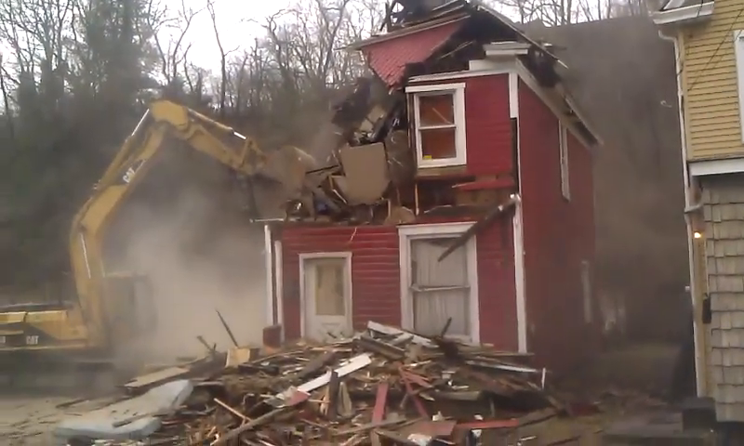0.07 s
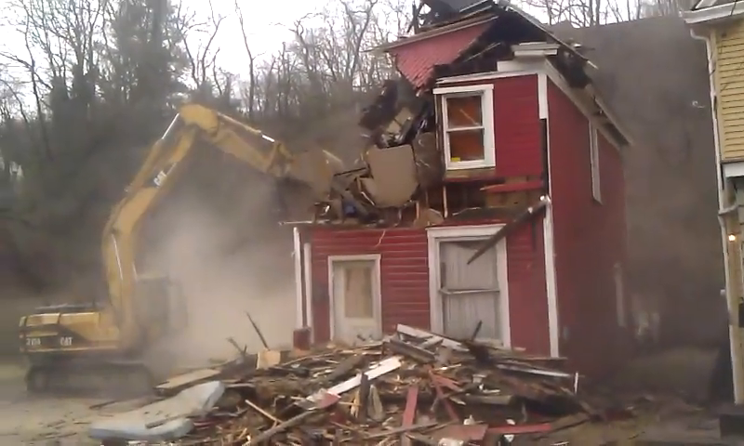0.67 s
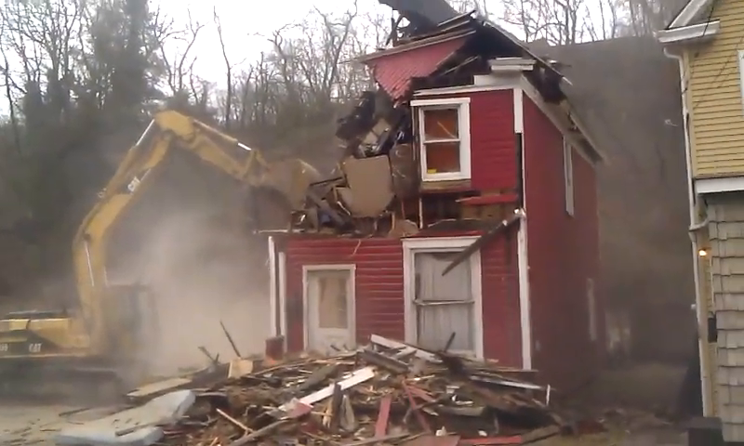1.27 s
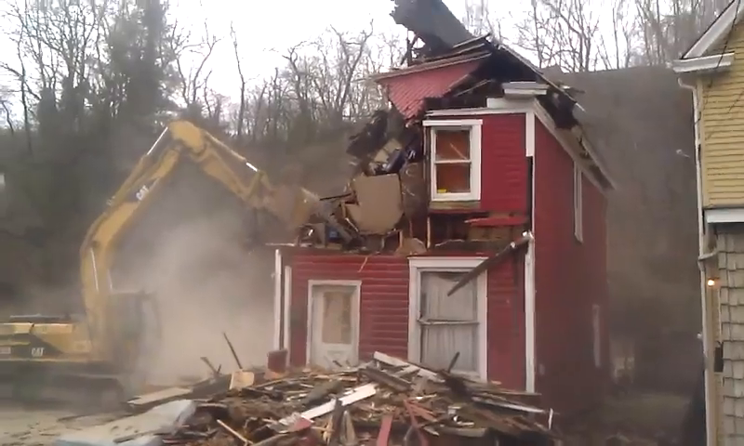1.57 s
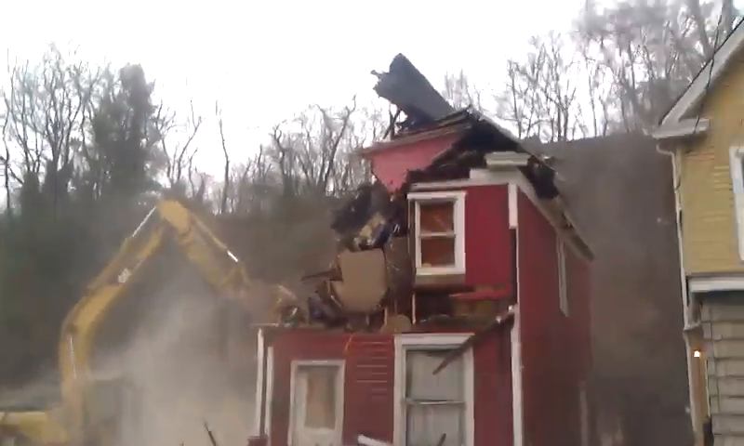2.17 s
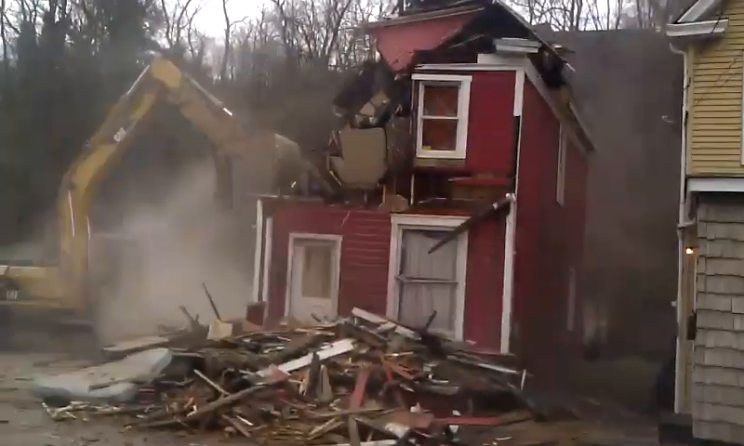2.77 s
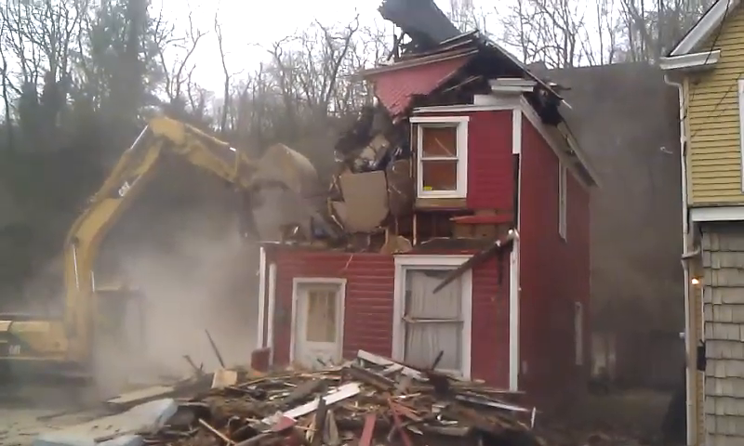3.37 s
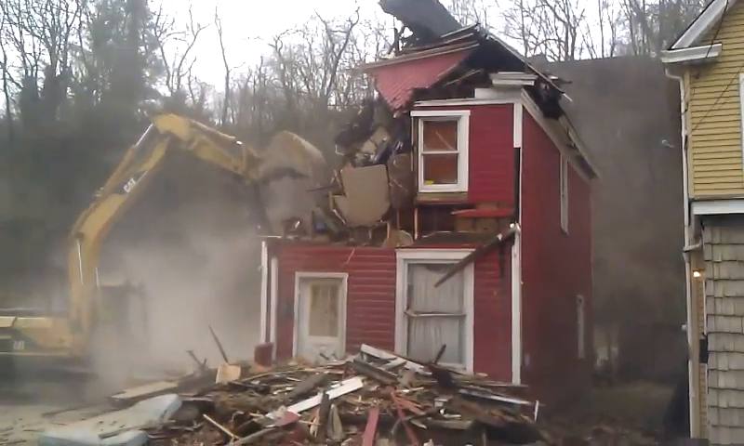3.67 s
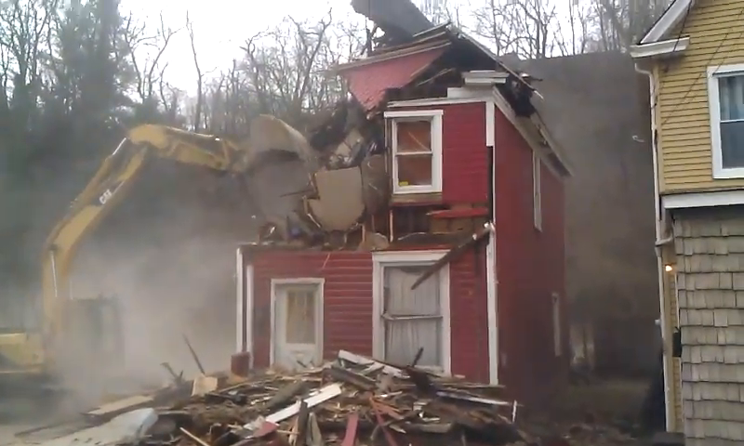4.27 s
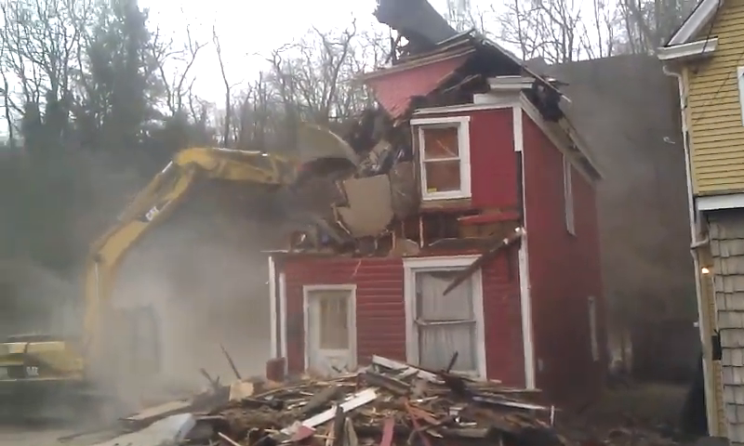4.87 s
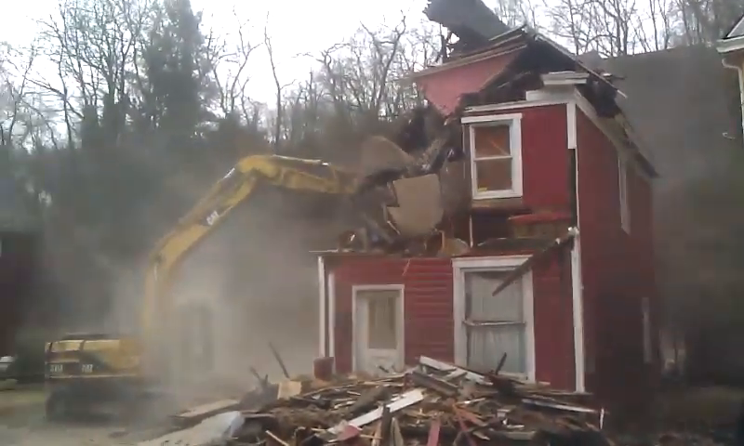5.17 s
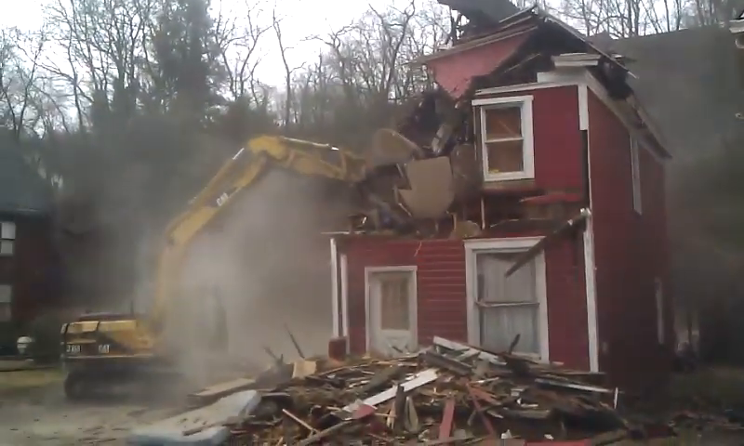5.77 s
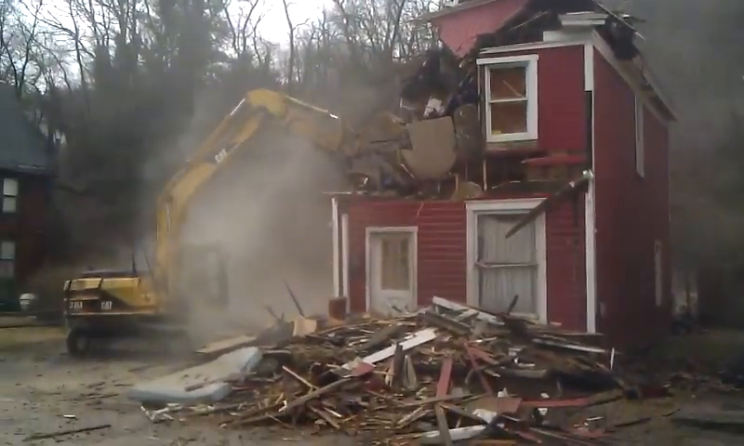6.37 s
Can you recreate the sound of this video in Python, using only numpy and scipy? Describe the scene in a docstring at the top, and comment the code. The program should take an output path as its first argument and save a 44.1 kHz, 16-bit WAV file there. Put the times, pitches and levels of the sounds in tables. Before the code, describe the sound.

Wind buffets the microphone, then eases as an excavator roars and whines, tearing into a wooden house with cracking boards and sliding debris.

```python
"""Wind buffets the microphone, so hard that a limiter (an automatic volume control) ducks all else.
Some way off outdoors, an excavator tears at a wooden house: its diesel roars under the whine of
the hydraulic pump. The bucket scrapes through the wall, boards crack and splinter, nails squeak,
and debris slides down with a few bright clinks. As the wind eases, lone eddies (small swirls of
air) still thump the microphone."""
import sys
import numpy as np
from scipy import signal
from scipy.fft import rfft, irfft, next_fast_len
from scipy.io import wavfile
from scipy.ndimage import uniform_filter1d, minimum_filter1d, map_coordinates

SR = 44100
rng = np.random.default_rng(int(sys.argv[2]) if len(sys.argv) > 2 else 0)


def transcribe(u):
    """Save the signal u as a 16-bit wav file named by the first command-line argument.

    u: samples, shape (n,) or (channels, n), limited to [-1, 1]; the rate is SR.
    q: integer samples, one column per channel.
    """
    v = np.clip(np.atleast_2d(u).T, -1, 1)
    q = np.round(v * 32767).astype(np.int16)
    wavfile.write(sys.argv[1], SR, q)


N = 282681
T = np.arange(N) / SR

# Levels in all tables are relative. A t60 is the time a sound takes to fade by 60 dB.
# tone colour of splintering wood: f/Hz, level/dB
SPLINTER_SPECTRUM = [(60, -68), (1000, -23), (2100, 5), (3000, 5.5), (4300, 6.5), (5700, -7.5),
                     (8200, -8.5)]


def excavator():
    """One shaft drives pump and gears; the diesel fires once for every three pump piston strokes."""
    # how fast the pump's pistons beat: t/s, f/Hz
    piston_rate = [(0.0, 307.7), (1.18, 305.7), (1.68, 311.3), (1.9, 307.4), (2.4, 318.2), (2.54, 317),
                   (2.74, 308.3), (3.1, 313.6), (3.22, 311), (3.52, 314.3), (3.98, 309.7), (4.26, 310.6),
                   (4.86, 313.5), (5.34, 318.5), (5.52, 314.4), (5.74, 317.3), (6.42, 307.4)]
    # the pump's lowest tone, its octave and its double octave, each: t/s, level/dB
    hum_levels = [(0, -33.5), (1.5, -38.5), (1.95, -34), (2.35, -35), (3.15, -34.5), (3.27, -45),
                  (3.4, -34), (3.7, -44), (4.05, -36), (4.4, -43), (4.65, -43.5), (4.85, -34.5),
                  (5.15, -32), (5.5, -44), (5.7, -33.5), (6.1, -40.5), (6.3, -33)]
    drone_levels = [(0, -54), (1.6, -39), (1.9, -37), (3.45, -35), (3.75, -39.5), (4.55, -36), (4.73, -52),
                    (4.95, -35.5), (5.5, -50.5), (6.41, -39)]
    sing_levels = [(0, -47), (1.5, -38.5), (1.82, -34), (2.5, -35.5), (3, -42.5), (3.7, -53), (4.3, -38),
                   (4.9, -45), (6.41, -43)]
    # loudness of the machine and of its whine, ducked while the wind buffets, each: t/s, level/dB
    machine_levels = [(0, -8), (1.4, -4), (2.3, 3), (3, 1), (4.2, 0), (5.1, 0.5), (6.41, 4.5)]
    whine_levels = [(0, -8), (1.4, -12), (1.85, 5.5), (2.35, -3), (2.7, 2.5), (3.05, -3), (3.25, 0),
                    (4.45, 3), (4.7, -1), (5, 1.5), (5.5, -5), (6.3, -0.5)]
    # the pump's weaker overtones: multiple of the piston rate, level/dB, flutter/rad
    overtones = [(3, -49.5, 0.33), (5, -47, 0.26), (7, -42.5, 0.38), (8, -49.5, 0.27), (9, -48.5, 0.45),
                 (10, -50.5, 0.12), (11, -49.5, 0.32), (12, -55, 0.4), (13, -50, 0.45), (14, -51, .4)]
    # two high tones that swell while the bucket curls: multiple of the piston rate
    squeal_multiples = [9.15, 10]
    # gear and fan tones at the average speed: f/Hz, level/dB
    gear_tones = [(216, -46), (255, -50), (535, -53), (917, -46.5), (1460, -48.5), (2890, -55),
                  (3990, -59.5)]
    # tone colour of the diesel's roar: f/Hz, level/dB
    roar_spectrum = [(20, -42.5), (45, -26), (100, -11), (150, -7), (230, -2.5), (450, -4.5), (800, -1),
                     (1100, -4), (1600, -5), (2500, -9.5), (3500, -8), (4500, -14.5), (5700, -22),
                     (8000, -27.5)]

    rate = over_time(piston_rate)
    phase = 2 * np.pi * np.cumsum(rate + 0.251 * wobble(10)) / SR
    hum = amp(over_time(hum_levels)) * wavering(phase, fade_db=1.8, drift=0.055, flutter=0.23)
    drone = amp(over_time(drone_levels)) * wavering(2 * phase, fade_db=1.2, drift=0.2, flutter=0.3)
    sing = amp(over_time(sing_levels)) * wavering(4 * phase, fade_db=2.5, drift=0.22, flutter=0.23)
    whine = sum(amp(db) * wavering(k * phase, fade_db=0.8, drift=0.078 * k, flutter=flutter)
                for k, db, flutter in overtones)
    whine *= amp(over_time(whine_levels))
    squeal = sum(wavering(k * phase, fade_db=3, drift=0.81, flutter=0.39) for k in squeal_multiples)
    squeal *= amp(-43.5) * envelope(start=4.37, length=0.79, rise=0.16, t60=0.37)
    gears = sum(amp(db) * wavering(hz / rate.mean() * phase, fade_db=3, drift=0.94, flutter=0.42)
                for hz, db in gear_tones)
    firing = phase / 3
    exhaust = amp(-52) * wavering(firing, fade_db=2, drift=0.14, flutter=0.17)
    pulsing_noise = rng.standard_normal(N) * (1 + 0.098 * np.cos(firing))
    roar = coloured(pulsing_noise, roar_spectrum) * amp(-29.5 + 0.61 * wobble(7.2))
    machine = amp(over_time(machine_levels)) * (whine + gears + exhaust + roar)
    return hum + drone + sing + squeal + machine


def scraping(rise=0.0019, t60=1):
    """The bucket drags through the wall: many tiny slips grind the boards and ring the steel."""
    # pushes of the bucket: start/s, length/s, level/dB
    strokes = [(1.465, 0.14, -18.5), (1.679, 0.093, -15), (1.736, 0.1, -21.5), (1.913, 0.11, -17.5),
               (2.035, 0.066, -17.5)]
    # tone colours of grinding boards and of rasping fibres, each: f/Hz, level/dB
    grind_spectrum = [(50, -44.5), (250, -4), (500, -11), (900, -3.5), (1260, -1.5), (2150, -4.5),
                      (2500, -18), (3300, -49.5)]
    rasp_spectrum = [(100, -44.5), (2000, -8), (2700, -14), (3500, 13.5), (4800, 14.5), (5400, 4),
                     (6100, -25)]
    # ringing notes of the steel bucket: f/Hz, width/Hz, level/dB
    bucket_modes = [(1307, 60, 9.5), (1460, 48, -4.5), (1600, 49, 9.5), (1717, 59, 12), (2160, 40, -7),
                    (3240, 31, -8.5), (3685, 140, -5), (4590, 51, -6)]

    drag = envelope(0, 1.44, rise, t60)  # lighter dragging before the bucket bites
    push = np.max([amp(db) * envelope(s, length, rise, t60) for s, length, db in strokes], axis=0)
    bite = sum(amp(db) * envelope(s, 0, rise, t60=0.17) for s, _, db in strokes)
    grind = np.maximum(push, amp(-25.5) * drag)
    rasp = amp(-3.5) * bite + amp(-13) * push + amp(-37) * drag  # strongest as the teeth bite
    judder = amp(1.2 * wobble(60))
    wood = amp(-4.5) * coloured(grains(rate=1500, spread_db=3), grind_spectrum)
    steel = amp(-9) * resonant(grains(rate=1800, spread_db=6), bucket_modes)
    fibres = amp(-4) * coloured(grains(rate=1500, spread_db=2), rasp_spectrum)
    return yard(judder * (grind * (wood + steel) + rasp * fibres), wet_db=-0.5)


def timbers(knock_t60=0.12, snap_t60=0.085, rise=0.00033, damping=0.2, snap_top_hz=5500):
    """Each timber gives way in a burst of tiny breaks: the board knocks and its fibres snap."""
    # breaking and falling timbers: t/s, knock/dB, f/Hz, upper notes/dB, tearing time/s, snap/dB
    cracks = [(1.475, -14, 805, 10, 0.0092, -27.5), (1.66, -16.5, 630, -6, 0.0096, -42),
              (1.914, -20, 1320, -5, .015, -22), (2.327, -21.5, 1100, -6, .008, -25),
              (2.364, -11.5, 736, -22, 0.014, -44), (2.5, -19, 1110, 4, 0.015, -24),
              (2.527, -23, 1500, 2, 0.0072, -24), (2.944, -15, 860, 6, .014, -34),
              (3.235, -19, 1100, -7, 0.014, -31), (3.472, -21, 700, 5, .008, -32),
              (5.034, -17.5, 1140, -7, .008, -26), (5.071, -21, 806, -4, .008, -29),
              (5.177, -11.5, 710, -8, 0.018, -11.5), (5.216, -16, 815, -3, .008, -20),
              (5.338, -18.5, 690, -23, 0.042, -21), (5.487, -19, 810, 2, 0.0067, -19),
              (5.611, -13.5, 775, -4.5, 0.015, -33), (5.732, -18.5, 1010, -4, 0.014, -30),
              (5.865, -15, 920, 3, 0.0068, -25), (5.913, -14, 1300, -4, 0.022, -17),
              (6.022, -10.5, 1110, -10, 0.023, -34), (6.15, -17, 674, -5, 0.017, -27)]

    out, t = np.zeros(N + SR), np.arange(SR // 4) / SR
    for s, knock_db, hz, upper_db, tearing, snap_db in cracks:
        bending_modes = [(ratio * hz, damping * ratio * hz, db)
                         for ratio, db in [(1, 4.6), (1.4, upper_db), (1.9, upper_db)]]
        swing = resonant(rng.standard_normal(len(t)), bending_modes)
        rattle = np.tanh(2 * swing)  # its neighbours limit the board's swing
        body = coloured(rattle, [(hz / 8, -20), (hz / 2, 0), (2.3 * hz, 0), (4 * hz, -20), (8 * hz, -40)])
        knock = body * amp(knock_db - 6.5 - 60 * np.maximum(t - tearing, 0) / knock_t60)
        breaks = grains(rate=5000, spread_db=1.5)[:len(t)]
        fibres = filtered(breaks, lambda f: 1 / np.sqrt(1 + (f / snap_top_hz) ** 2))
        snap = coloured(fibres, SPLINTER_SPECTRUM) * amp(snap_db - 60 * t / snap_t60)
        out[round(s * SR):][:len(t)] += (knock + snap) * (1 - np.exp(-t / rise))
    return yard(out[:N], wet_db=-9)


def debris():
    """Boards tumble in clumps and splinter; each slide gathers quickly and trickles out."""
    # slides of debris: start/s, length/s, tumbling/dB, splintering/dB
    slides = [(2.3, 0.032, -30, -48), (2.385, .1, -28, -36), (2.487, 0.027, -21.5, -26),
              (2.688, 0.044, -36, -38), (2.938, 0.015, -22.5, -46), (3.185, 0.019, -26, -44),
              (4.89, 0.086, -42, -38.5), (5.034, 0.08, -29, -31.5), (5.197, 0.062, -21.5, -29),
              (5.289, 0.11, -22, -24.5), (5.452, 0.058, -33, -27.5), (5.623, 0.05, -27.5, -29),
              (5.713, 0.038, -30, -22.5), (5.861, 0.016, -27.5, -18.5), (5.91, 0.18, -21, -16),
              (6.229, 0.18, -25, -39)]
    # tone colour of tumbling boards: f/Hz, level/dB
    board_spectrum = [(60, -49), (180, 0.5), (300, 8.5), (450, -6), (720, 10), (1100, 0.5), (1650, 1),
                      (2400, -1), (4000, -26.5)]

    shapes = np.array([envelope(s, length, rise=0.0041, t60=0.4) for s, length, *_ in slides])
    gains = amp(np.array(slides)[:, 2:].T)
    tumble, splinter = np.sqrt(gains ** 2 @ shapes ** 2)  # overlapping slides add in power
    clumps = wobble(35)
    boards = coloured(grains(rate=900, spread_db=4), board_spectrum) * amp(-3.5 + 0.66 * clumps)
    laths = amp(-4) * coloured(clatter(), [(60, -40), (400, 10.5), (4500, 2), (6000, -23.5)])
    chips = coloured(grains(rate=1100, spread_db=-1), SPLINTER_SPECTRUM) * amp(-3.5 + 1.2 * clumps)
    return yard(tumble * (boards + laths) + splinter * chips, wet_db=6.5)


def clatter(count=400, pitch_hz=1500, cycles=22, spread_db=4):
    """Laths (thin strips of wood) hit one another at random, each with its own short ring."""
    t = np.arange(SR // 16) / SR
    pitch, size = np.clip(rng.standard_normal((count, 2)), -2, 2).T[:, :, None]
    turns = pitch_hz * np.exp(0.5 * pitch) * t
    rings = np.sin(2 * np.pi * turns) + 1.23 * np.sin(2 * np.pi * 1.9 * turns)
    rings *= amp(spread_db * size - 60 * turns / cycles)
    where = rng.integers(0, N, (count, 1)) + np.arange(len(t))
    return unit(np.bincount(where.ravel(), rings.ravel(), N)[:N])


def nails():
    """Nails squeak as they are drawn from the timber, sticking and slipping at an unsteady rate."""
    # pulled nails: start/s, length/s, f/Hz, level/dB
    pulls = [(1.676, 0.038, 1722, -22.5), (2.366, 0.17, 2893, -39), (2.487, .03, 2140, -36),
             (6.068, 0.044, 1644, -22.5)]

    squeaks = np.zeros(N)
    for s, length, hz, db in pulls:
        tone = wavering(2 * np.pi * hz * T, fade_db=3, drift=1.6, flutter=0.41)
        squeaks += amp(db) * envelope(s, length, rise=0.0068, t60=0.039) * tone
    return yard(squeaks, wet_db=-7)


def clinks():
    """Hard scraps chatter and ring briefly as they land."""
    # scraps landing: t/s, level/dB, f/Hz, upper note/dB, t60/s
    landings = [(4.827, -22.5, 4605, 0, 0.099), (5.177, -12, 4382, -19, .035)]
    # ringing notes of a scrap: multiple of f, width/Hz, level/dB, multiple of t60
    scrap_modes = [(.784, 70, -5.5, 2.4), (1, 129, -1, 1), (1.55, 550, -7, 1.9)]

    out, t = np.zeros(N + SR), np.arange(SR // 3) / SR
    for s, db, hz, upper_db, t60 in landings:
        for ratio, width, mode_db, life in scrap_modes:
            ring = resonant(rng.standard_normal(len(t)), [(ratio * hz, width, 0)])
            fade = amp(mode_db + upper_db * (ratio > 1) - 60 * t / (life * t60))
            out[round(s * SR):][:len(t)] += amp(db) * fade * ring
    return yard(out[:N], wet_db=-11)


def wind(rise=0.0012, t60=0.059, breakup_s=0.069, shove_hz=70):
    """Each gust hits the microphone with a dull thud and, if it lasts, breaks into eddies."""
    # gusts on the microphone: start/s, length/s, level/dB
    gusts = [(0, 0.026, -20), (0.051, .09, -23), (0.155, 0.03, -22.5), (0.252, 0.02, -22.5),
             (0.308, 0.13, -19.5), (0.473, 0.035, -21), (.564, 0.017, -18), (0.609, 0.074, -15.5),
             (0.71, 0.28, -17), (1.033, 0.027, -15.5), (1.16, 0.22, -17), (1.394, 0.055, -13.5),
             (1.502, 0.053, -28), (1.644, 0.018, -25.5), (1.87, 0.026, -24.5), (2.095, 0.026, -27),
             (2.427, 0.02, -25), (2.597, 0.1, -32), (2.795, 0.028, -19), (3.66, 0.025, -36.5),
             (3.783, 0.04, -32), (5.657, .04, -32.5)]
    # tone colours of the eddies and of a gust's first push, each: f/Hz, level/dB
    eddy_spectrum = [(25, -24), (64, -24), (120, -8.5), (200, 0.5), (360, 1), (600, -6), (900, -12),
                     (1500, -17.5), (3000, -36.5), (6000, -63)]
    thud_spectrum = [(25, -19), (60, -18.5), (150, -2), (400, 1), (650, -6), (1200, -15.5), (5000, -68)]

    push, eddies = np.zeros(N), np.zeros(N)
    for s, length, db in gusts:
        strength = amp(db) * envelope(s, length, rise, t60)
        smooth = np.exp(-(np.maximum(T - s, 0) / breakup_s) ** 2)
        push += strength * smooth
        eddies += strength * np.sqrt(1 - smooth ** 2)
    lulls = amp(-11 * np.maximum(wobble(90) - 0.5, 0))
    breeze = amp(-29.5) * envelope(0, 1.5, rise, t60)  # fills the gaps between the first gusts
    blow = np.maximum(eddies, breeze) * lulls * amp(4.5 + 1.2 * wobble(40))
    # a gust's pressure, the square of its strength, shoves the microphone's membrane
    shove = amp(5.5) * filtered(push ** 2, lambda f: resonance(f, shove_hz, width=shove_hz) ** 2)
    buffet = blow * coloured(rng.standard_normal(N), eddy_spectrum)
    thud = push * coloured(rng.standard_normal(N), thud_spectrum)
    return shove + buffet + thud


def thumps(half_length_s=0.0017):
    """A lone eddy swings the microphone's membrane for a cycle or two."""
    # single eddies: t/s, level/dB, f/Hz
    eddies = [(0.642, -10, 576), (1.104, -11, 460), (1.342, -1, 580), (1.435, -13, 112), (2.609, -6.5, 414),
              (2.624, -14, 363), (2.654, -14, 255), (2.688, -14, 285), (2.719, -16, 382), (2.807, -5, 436),
              (2.823, -8, 153), (3.811, -17, 228)]

    out, t = np.zeros(N), np.arange(-SR // 25, SR // 25) / SR
    for s, db, hz in eddies:
        swing = np.sin(2 * np.pi * (hz * t + rng.random())) * np.exp(-(t / half_length_s) ** 2 / 2)
        out[round((s + t[0]) * SR):][:len(t)] += amp(db) * swing
    return out


def yard(x, wet_db):
    """Add a short, diffuse outdoor echo (at wet_db) with no ringing pitch of its own."""
    # how long the echo lasts: f/Hz, t60/s
    echo_times = [(200, 0.81), (1500, 0.59), (8000, 0.59)]

    out, step = np.zeros(N + SR), SR // 4
    for i in range(0, N, step):
        hz, t, noise = signal.stft(rng.standard_normal(SR // 3), SR, nperseg=256)
        fade = amp(-60 * t / over_frequency(echo_times, hz)[:, None])
        tail = signal.istft(noise * fade, SR, nperseg=256)[1]
        echo = signal.fftconvolve(x[i:i + step], tail / np.linalg.norm(tail))
        out[i:i + len(echo)] += echo
    return (x + amp(wet_db) * out[:N]) / np.hypot(1, amp(wet_db))


def wavering(phase, fade_db, drift, flutter):
    """A tone that fades, drifts and flutters on its way through moving air."""
    coarse_t = T[::64]

    def curve(rate):
        return map_coordinates(rng.standard_normal(int(rate * N / SR) + 4), [coarse_t * rate])

    fading_db = fade_db * (1.06 * curve(3.046) + 0.6 * curve(14))
    size = np.sqrt(2) * amp(fading_db + 7.1 * flutter * curve(50) - 0.5)
    slip = drift * curve(8) + flutter * curve(70) + 2 * np.pi * rng.random()
    return np.interp(T, coarse_t, size) * np.sin(phase + np.interp(T, coarse_t, slip))


def grains(rate, spread_db):
    """Tiny random breaks, about `rate` a second, many weak and a few strong."""
    sizes = rng.standard_normal(N) * amp(spread_db * np.clip(rng.standard_normal(N), -2, 2))
    return unit(sizes * (rng.random(N) < rate / SR))


def wobble(rate):
    """A smooth curve through `rate` random values a second."""
    knots = rng.standard_normal(int(N * rate / SR) + 4)
    steps = np.arange(8 * len(knots)) / 8
    return np.interp(T * rate, steps, map_coordinates(knots, [steps]))


def envelope(start, length, rise, t60):
    """A gain that rises, holds and dies away; all times in seconds."""
    t = np.maximum(T - start, 0)
    return (1 - np.exp(-t / rise)) * amp(-60 * np.clip((t - length) / t60, 0, 2))


def filtered(x, response):
    """Scale each frequency f in x by response(f)."""
    size = next_fast_len(len(x) + SR // 4)
    return irfft(rfft(x, size) * response(np.fft.rfftfreq(size, 1 / SR)), size)[:len(x)]


def coloured(x, spectrum):
    """Give x a tone colour (f/Hz, level/dB), at rms 1."""
    return unit(filtered(x, lambda hz: amp(over_frequency(spectrum, hz))))


def resonance(f, hz, width):
    """How something that rings at hz responds to frequency f."""
    return 1j * f * width / (hz * hz - f * f + 1j * f * width)


def resonant(x, modes):
    """Let x ring a set of notes (f/Hz, width/Hz, level/dB), at rms 1."""
    return unit(filtered(x, lambda f: sum(amp(db) * resonance(f, hz, width) for hz, width, db in modes)))


def over_time(points):
    """Join (t/s, value) points with straight lines."""
    return np.interp(T, *np.transpose(points))


def over_frequency(points, hz):
    """Read between (f/Hz, value) points on a log frequency axis."""
    f, values = np.transpose(points)
    return np.interp(np.log(hz + 1), np.log(f + 1), values)


def amp(db):
    """Decibels to gain."""
    return 10 ** (np.asarray(db) / 20)


def unit(x):
    """Scale x so that its rms (average strength) is 1."""
    return x / np.sqrt(np.mean(x ** 2) + 1e-20)


def scene():
    """Machine, breaking house and wind at one microphone."""
    return (excavator() + scraping() + debris() + timbers() + nails() + clinks() + wind() + thumps())[None]


def record(dry, threshold=0.43, hold_s=0.012, bass_weight=0.84, top_hz=8450):
    """A fast limiter, most sensitive to bass, holds the peaks down; treble above top_hz is cut off."""
    x = dry[0]
    span = int(hold_s * SR)
    bass = filtered(x, lambda hz: 1 / (1 + (hz / 480) ** 4))
    needed_gain = np.minimum(1, threshold / (np.abs(x + bass_weight * bass) + 1e-9))
    gain = uniform_filter1d(minimum_filter1d(needed_gain, span), span)
    return filtered(x * gain * amp(0.3), lambda hz: 1 / np.sqrt(1 + (hz / top_hz) ** 140))[None]


dry = scene()
out = record(dry)
transcribe(out)
```